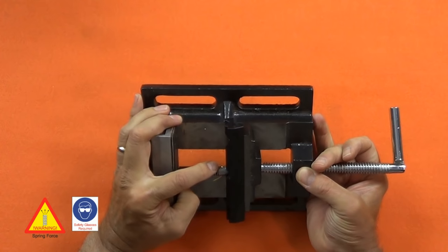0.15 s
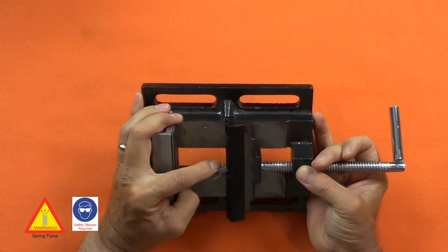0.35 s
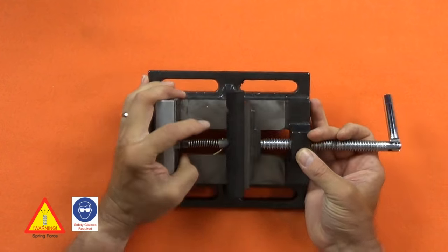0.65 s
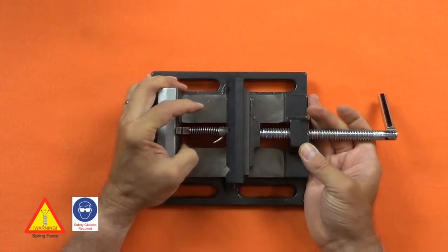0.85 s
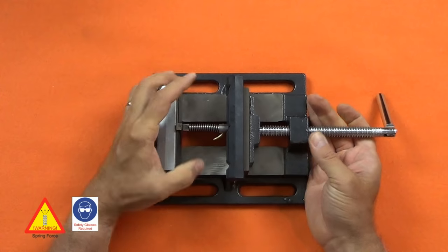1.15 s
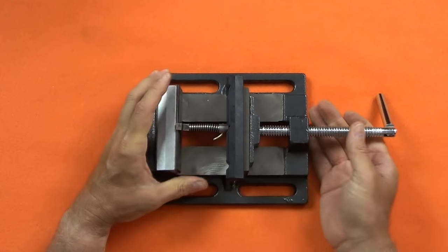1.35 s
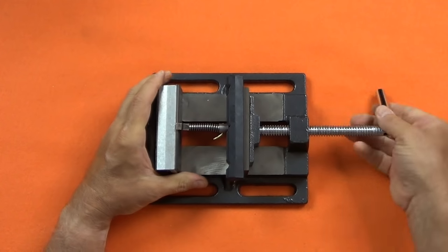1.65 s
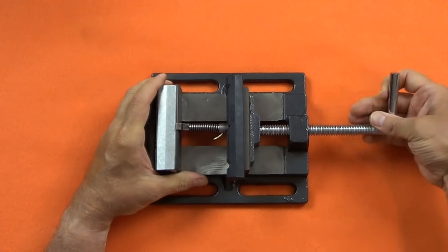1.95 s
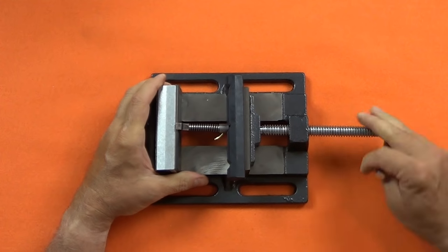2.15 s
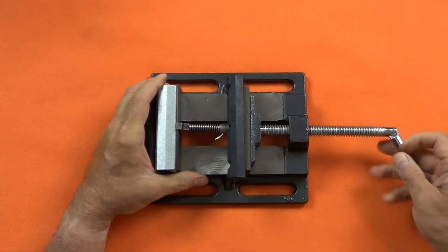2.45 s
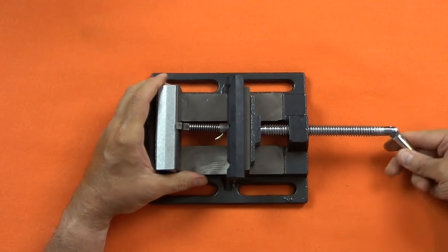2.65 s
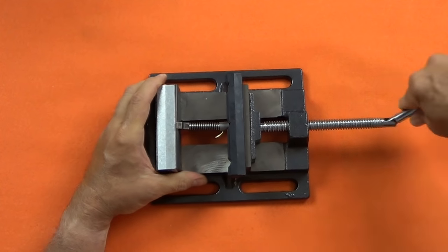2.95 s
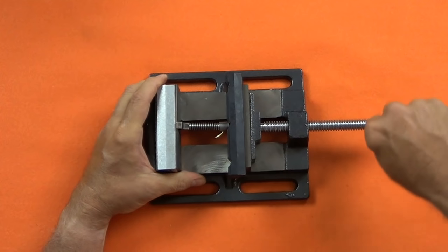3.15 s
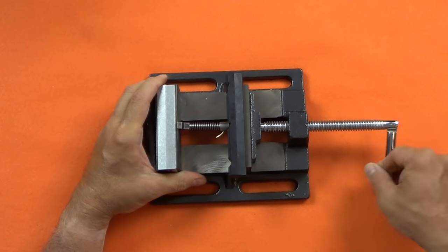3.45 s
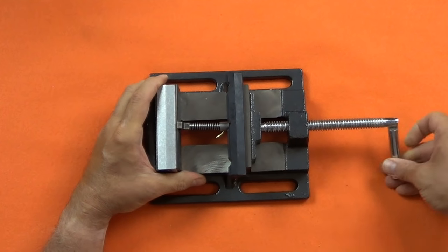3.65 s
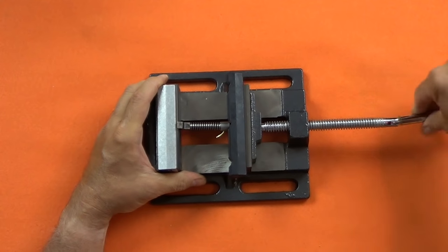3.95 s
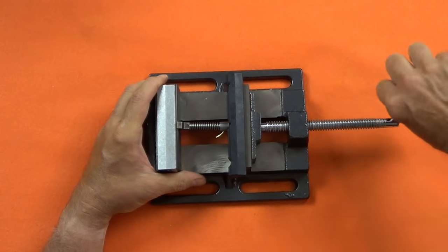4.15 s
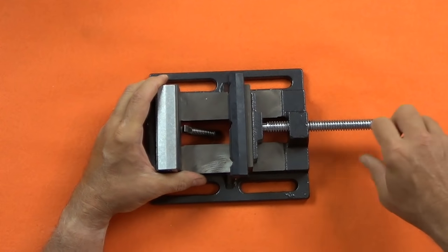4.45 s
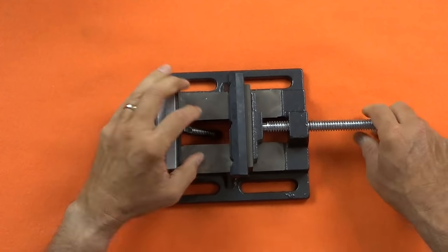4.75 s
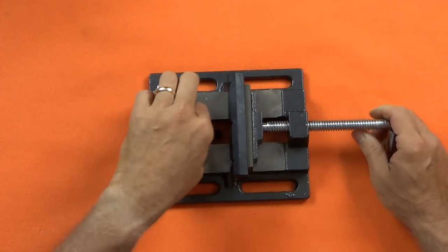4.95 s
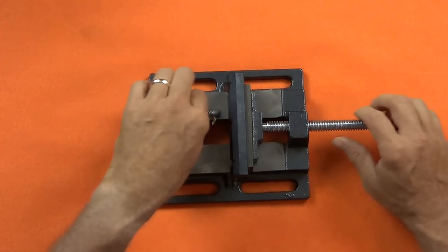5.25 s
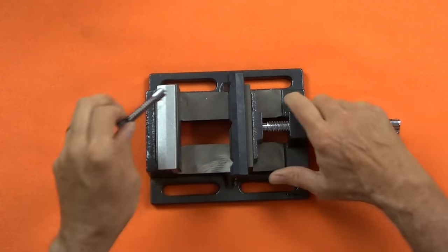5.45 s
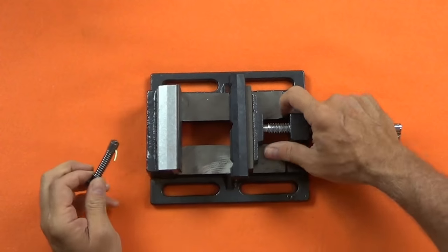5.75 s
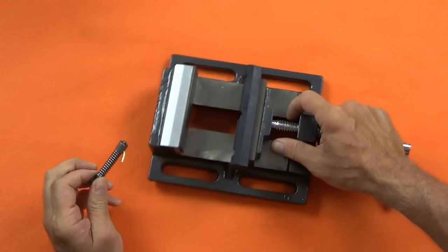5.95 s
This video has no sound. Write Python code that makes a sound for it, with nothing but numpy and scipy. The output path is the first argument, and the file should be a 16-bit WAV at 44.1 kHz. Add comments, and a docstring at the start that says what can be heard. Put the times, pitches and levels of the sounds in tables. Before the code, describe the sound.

Small iron vise handled on a cloth-covered bench: sharp clack, faint thread scraping, loose handle clicks, bright spring chatter, ringing clinks, then soft dragging.

```python
"""On a cloth-covered bench in a quiet room, a small cast-iron drill vise is handled.
Its threaded rod scrapes out and clacks home, its loose crank rattles, a freed spring drops and chatters,
the spring's steel pin clinks on the jaw, and the vise is dragged round. Impacts are noise cracks with
decaying modes, friction is random slips; room echoes answer both. Behind them lie rumble, mains hum,
and a camera's hiss and thin whine."""
import sys
import numpy as np
from scipy import signal
from scipy.fft import rfft, irfft
from scipy.io import wavfile
from scipy.ndimage import uniform_filter1d

SR = 44100
rng = np.random.default_rng(int(sys.argv[2]) if len(sys.argv) > 2 else 0)


def to_wav(sig):
    """Store sig (one row per channel, or 1-D mono) as 16-bit WAV at the path in sys.argv[1].

    Samples outside -1..1 are clipped; the rate is SR.
    """
    pcm = np.clip(np.atleast_2d(sig), -1, 1) * 32767
    pcm = np.round(pcm).astype(np.int16)
    wavfile.write(sys.argv[1], SR, pcm.T)  # frames by channels


N = 269492

# Steady background spectrum: hz, relative_density_db
FLOOR_SPECTRUM = [(20, -14), (42, -9), (55, -4), (69, 5.5), (85, 2.5), (105, -5), (175, -1.5), (260, -3.5),
                  (600, -8.5), (1500, -14.5), (3300, -15), (5000, -18.5), (10000, -18), (16000, -18.5)]
FLOOR_DB = -55  # rms
# Narrow bumps on that spectrum: centre_hz, width_hz, height_db
FLOOR_BUMPS = [(2457, 76, 11.1), (3804, 154, 8.7), (5630, 79, 2.2), (7050, 450, 2.9), (12150, 420, 3.7),
               (13100, 200, 4.2)]
# Side share of the background: hz, side_to_mid_db
FLOOR_SIDE_SHARE = [(60, -22.5), (120, -9.5), (240, -3.5), (480, 2.5), (950, 5.5), (1890, 2), (3770, -5),
                    (7520, -0.5), (15000, -37.5)]
# Mains hum and camera whine: pitch_hz, rms_db
STEADY_TONES = [(119.9, -63.5), (15735, -64.5)]

# Strokes of friction, each: start_s, attack_s, hold_s, release_s, level_db
# the hand bears on the rod and the thread scrapes harder (several strokes)
HAND_PUSHES = [(1.55, 0.095, 0.01, 0.1, -59), (1.85, 0.33, 0.03, 0.13, -58), (4.1, 0.16, 0.02, 0.1, -55.5)]
# the crank is turned
CRANKING_STROKE = (2.4, 0.3, 1.9, 0.3, -61)
# the freed spring chatters between its bounces
CHATTER_STROKE = (4.33, 0.09, 0.065, 0.05, -46.5)
# the pin slides along the jaw between its clinks
SLIDE_STROKE = (5.235, 0.035, 0.052, 0.014, -51)
# the vise slides over the cloth
DRAG_STROKE = (5.76, 0.05, 0.16, 0.16, -56)
# a stroke swells by SWELL_DB over its attack, and sinks as much over each release time
SWELL_DB = 18
# the thread's scrape peaks once a turn and eases by TURN_EASE_DB between
TURN_S, TURN_PEAK_S, TURN_EASE_DB = 0.53, 3.31, 6

# Friction spectra, each: hz, relative_density_db
THREAD_SPECTRUM = [(100, -20), (350, 2), (1400, -6), (2200, -8), (5000, -11), (8000, -12.5), (11000, -11),
                   (16000, -27)]
CHATTER_SPECTRUM = [(150, -13), (350, -9), (650, 2), (900, -1), (1300, 0), (2200, -1), (3000, -8),
                    (5000, -9), (7400, -2), (10500, -12), (13000, -24), (16000, -28)]
RASP_SPECTRUM = [(300, -16), (1300, -7), (2600, 0), (3800, 0), (5000, -7), (10000, -8), (16000, -17)]
DRAG_SPECTRUM = [(40, -10), (150, -5), (550, -6), (1500, -11), (5000, -14), (16000, -11.5)]

# Faint thread squeaks: start_s, length_s, start_hz, end_hz, rms_db
THREAD_SQUEAKS = [(2.082, 0.036, 11100, 11000, -65), (2.148, .045, 11050, 10850, -66),
                  (2.155, 0.12, 5300, 4880, -67), (4.20, 0.12, 4730, 4700, -68)]

# Steel contacts, each: start_s, strength_db, hardness_db_per_octave, casting_knock_db,
# favoured_hz (by the point of contact), ring_over_crack_db; each part then trims level and ring
# the rod clacks and ticks in its nut
ROD_CONTACTS = [(1.655, -51.5, -3, -69, 4860, -11), (1.6695, -51.5, -1, -62, 10190, -2),
                (1.6857, -31.5, 1.2, -50.5, 10570, -10), (1.6955, -48.5, -6, -56, 6480, -6),
                (2.535, -64, -3, -69, 3140, -12), (2.573, -55.5, 3, -72, 8750, -14),
                (2.667, -58, 7, -66, 12400, -15), (5.798, -47.5, 1.5, -60, 8900, -12),
                (5.8185, -47, 9, -50, 12810, -9), (5.828, -55, -4, -58, 5830, -14),
                (6.039, -57, 2, -63, 10590, -10)]
# the loose handle and the freed spring rattle on the vise
CRANK_CONTACTS = [(3.018, -59.5, -7, -68, 2160, -9), (3.27, -61.5, -2, -61, 7990, -2),
                  (3.287, -56, -1.5, -62, 7700, -10), (3.6892, -43.5, 3, -57, 11000, -8),
                  (3.6925, -37, 10, -57, 11000, -4), (3.696, -37.5, 3.5, -52, 7400, -5),
                  (3.702, -37, 3, -51.5, 11100, -5), (3.7075, -44, 0, -51, 7400, -8),
                  (3.725, -51, -3, -53, 7400, -2), (3.9485, -42.5, 1.5, -66, 7400, -6),
                  (3.951, -42.5, -1.5, -46.5, 2100, 0), (3.962, -56, -11, -46, 2020, -5),
                  (4.3085, -45.5, 2.5, -56, 7190, -2), (4.331, -52, -1, -53, 11090, 1),
                  (4.3506, -30.5, 1.5, -46, 11390, -8), (4.3555, -28.5, 1, -45, 11200, -13),
                  (4.359, -28, 5, -53, 10640, -2), (4.3665, -34.5, 3.5, -45.5, 10800, -8),
                  (4.387, -45, 0, -47, 10120, -6), (4.4062, -34.5, -5.5, -37, 9020, -9),
                  (4.424, -56, -8, -48, 2090, -6), (4.434, -50.5, -5, -46, 7430, -3),
                  (4.445, -44.5, -1.5, -44, 10640, -4), (4.4615, -38, 3, -56, 10200, -3),
                  (4.4845, -39.5, -3.5, -42, 10600, 2), (4.596, -60, -1, -62, 2100, -1),
                  (5.6, -53, -3, -62, 7840, -4), (5.655, -57, 1, -62, 10720, -2),
                  (5.677, -61.5, -4.5, -61, 2110, -3), (5.7138, -43, 0.5, -57, 11070, 0.5),
                  (5.7207, -36.5, 1.5, -57.5, 11100, -3.5), (5.758, -47.5, -1.5, -57, 6870, -4)]
# the pin clinks on the jaw
JAW_CONTACTS = [(5.2008, -41, 3.5, -69, 8510, -3), (5.245, -53, -1.5, -63, 2840, -1),
                (5.267, -47.5, -0.5, -62, 2820, 0), (5.283, -48, -1, -58, 2860, -5),
                (5.291, -58.5, -9, -65, 2280, 10), (5.304, -49.5, -2, -56.5, 5510, 3),
                (5.316, -48, -2.5, -59, 2390, 0)]
# Dull knocks of the iron frame: start_s, knock_db, clank_db, favoured_hz
FRAME_KNOCKS = [(2.773, -55, -58, 1380), (2.848, -59, -60, 1400), (3.222, -54, -72, 563),
                (3.320, -51, -72, 720), (3.501, -51, -52.5, 2050), (3.600, -47, -54, 640),
                (4.133, -47.5, -49, 2150), (4.302, -49, -65, 750), (5.786, -45, -53, 585),
                (5.879, -58, -62, 1002), (5.919, -55, -59, 570)]
# The vise rocks on the bench: start_s, level_db
BENCH_THUMPS = [(4.406, -54), (4.431, -38.5), (4.479, -48), (4.507, -52), (5.789, -49), (5.828, -57),
                (5.895, -51), (5.917, -56)]

# Modes of each part, before detuning and favouring: pitch_hz, level_db, t60_s
ROD_MODES = [(1558, -6, 0.12), (3020, -8, 0.082), (3262, -7, .06), (3970, -11, 0.089), (4683, -5, 0.065),
             (5200, -1, 0.047), (5440, -18, 0.081), (6430, -8, 0.13), (7060, -3, .09), (7321, -13, .14),
             (7860, -4, .05), (8769, -2, 0.043), (9619, -4, .04), (10100, 4, 0.039), (10632, -4, 0.054),
             (14000, -13, .08)]
CRANK_MODES = [(336.3, -11.5, 0.27), (559, -7.5, 0.056), (661, -9, 0.088), (746, -13, 0.2),
               (1399, -6.5, 0.092), (2000, -10, .08), (2064, -11.5, 0.12), (2280, -18, 0.13),
               (2915, -17.5, 0.13), (3580, -29, 0.033), (3860, -11.5, .09), (4010, -10, 0.074),
               (4686, -6, 0.054), (5500, -28, 0.12), (6900, -15, .07), (7165, 4.5, 0.041), (7270, -8, 0.14),
               (7360, 1, 0.047), (7600, -6.5, 0.066), (8400, -16, .07), (8980, -14, .05),
               (10300, -2, 0.044), (10520, 9.5, 0.02), (10810, -13, 0.042), (11350, -7, 0.044),
               (11200, 2, 0.046), (11800, -3, 0.028), (14000, -17, .08), (14860, -13, 0.059)]
JAW_MODES = [(2036, -11.5, 0.13), (2295, 0, 0.18), (2427, -7, 0.13), (2836, -0.5, 0.12), (3840, -10, 0.1),
             (4021, -8, 0.09), (4690, -12, .1), (5550, 0, 0.085), (5970, 0, .06), (6379, 0, .06),
             (7132, -4, 0.17), (7439, -9, 0.11), (7790, -7, .12), (8580, 3, 0.091), (10012, 6, .1),
             (11050, -4, .07), (14250, -13, .04), (15272, -16, .05)]
FRAME_MODES = [(341.5, -3.5, 0.28), (551, 2, .09), (638, -6.5, .1), (740, -8, 0.11), (1107, -3, 0.071),
               (1400, -7, 0.12), (2150, -13, 0.1), (2240, -15, 0.11)]
# bench top and board, whose decay is further shortened by the hands
BENCH_MODES = [(63, -1, 0.51), (85.5, -9, .15)]
BOARD_MODES = [(178, -4.5, 0.13), (198, 1.5, 0.12), (326.6, -15, 0.32)]

# Spectra of the short crack of a contact, each: hz, relative_density_db
ROD_CRACK_SPECTRUM = [(100, -30), (400, -5), (1200, -4), (1600, -3), (2100, -9.5), (3200, -1), (4100, -2),
                      (5000, -0.5), (7000, -0.5), (8600, 1), (10700, 2), (12500, -6), (16000, -10)]
STEEL_CRACK_SPECTRUM = [(100, -20), (320, -3), (600, 6), (900, -2), (1150, 6), (1700, -4), (2150, -1),
                        (2700, -7.5), (3600, -2), (5200, -4), (7400, 0.5), (9500, 1.5), (11000, 9),
                        (12500, -4.5), (16000, -2.5)]
IRON_CRACK_SPECTRUM = [(100, -17), (300, 6.5), (650, 6), (1200, -2), (2200, -12.5), (3200, -20.5),
                       (6000, -44), (12000, -49)]

# Bands of a blow (knock, clank, zing, sparkle, fizz): low_hz, high_hz
BLOW_BANDS = [(200, 1500), (1500, 6000), (6000, 9500), (9500, 12200), (12200, 16000)]
# Band balance of each part at zero hardness: clank_db, zing_db, sparkle_db, fizz_db
ROD_BALANCE = [-2, 0, -3, -13]
CRANK_BALANCE = [-3, 0.3, 0.5, -8]
JAW_BALANCE = [-0.5, 0, 0.2, -5.5]
# hardness tilts the sound about PIVOT_HZ; the band that holds the favoured pitch gains FAVOURED_BAND_DB
PIVOT_HZ, FAVOURED_BAND_DB = 7550, 4
# contact time (to 1/e) at zero hardness halves for every HALVING_DB_PER_OCTAVE of hardness
CONTACT_S, HALVING_DB_PER_OCTAVE = 0.0042, 18
FRAME_CONTACT_S = 0.0058

# Reverberation time of the room: hz, t60_s
ROOM_DECAY = [(100, 0.83), (500, 0.93), (2000, .5), (7000, .45), (11000, 0.28), (16000, 0.3)]
# Filter on the side echoes: hz, gain_db
ECHO_WIDTH = [(60, -23), (200, -10), (600, -10), (1500, -8), (2500, -13.5), (5000, -8), (8000, -11),
              (12000, -19.5), (16000, -44)]
EDGE_HZ = 15950


def amp(db):
    """Level: decibels to amplitude ratio."""
    return 10 ** (np.asarray(db) / 20)


def unit(x):
    """Normalisation: scales a signal to rms 1."""
    return x / np.sqrt(np.mean(x ** 2) + 1e-20)


def read(points, hz):
    """Logarithmic frequency: interpolates a table on a log-frequency axis."""
    f, value = np.transpose(points)
    return np.interp(np.log(hz + 1), np.log(f + 1), value)


def add(mix, s, sound):
    """Superposition: lays a sound into the mix at time s."""
    part = mix[round(s * SR):][:len(sound)]
    part += sound[:len(part)]


def colour(x, db_at):
    """Minimum phase: a causal filter of gain db_at(Hz), so that attacks stay sharp."""
    size = 2048
    log_gain = np.log(amp(db_at(abs(np.fft.fftfreq(size, 1 / SR)))) + 1e-5)
    taps = np.fft.ifft(np.exp(np.conj(signal.hilbert(log_gain)))).real
    return signal.fftconvolve(x, taps[:size // 2])[:len(x)]


def noise(db_at):
    """Spectral shaping: steady noise of rms 1 with the spectrum db_at(Hz)."""
    gain = amp(db_at(np.fft.rfftfreq(N, 1 / SR)))
    return unit(irfft(rfft(rng.standard_normal(N)) * gain, N))


def background():
    """Stationary noise and pure tones: rumble, hiss with bumps, hum and whine; returns mid and side."""
    def floor_db(hz):
        bumps = sum(db * np.exp(-((hz - f) / width) ** 2) for f, width, db in FLOOR_BUMPS)
        return read(FLOOR_SPECTRUM, hz) + bumps
    t = np.arange(N) / SR
    tones = np.zeros(N)
    for hz, db in STEADY_TONES:
        tones += amp(db) * np.sqrt(2) * np.sin(2 * np.pi * (hz * t + rng.random()))
    side_gain = amp(read(FLOOR_SIDE_SHARE, np.fft.rfftfreq(N, 1 / SR)))
    side = irfft(rfft(noise(floor_db)) * side_gain, N)
    return np.array([amp(FLOOR_DB) * noise(floor_db) + tones, amp(FLOOR_DB) * side])


def stroke(start, attack, hold, release, db):
    """Friction envelope: gain over time, linear in decibels, through attack, hold and release."""
    t = np.arange(N) / SR - start
    short_of_full = np.maximum(1 - t / max(attack, 1e-3), (t - attack - hold) / max(release, 1e-3))
    return amp(db - SWELL_DB * np.clip(short_of_full, 0, 10))


def rub(pressure, spectrum, slips_per_s, smooth):
    """Friction: tiny random slips over a smooth hiss, scaled by the pressure of the stroke."""
    slips = rng.standard_normal(N) * (rng.random(N) < slips_per_s / SR)
    grain = colour(unit(slips) + smooth * rng.standard_normal(N), lambda hz: read(spectrum, hz))
    return unit(grain) * pressure


def thread():
    """Sliding friction: the thread scrapes in its nut, swelling each turn and at each push of the hand."""
    easing = np.sin(np.pi * (np.arange(N) / SR - TURN_PEAK_S) / TURN_S) ** 2
    turns = stroke(*CRANKING_STROKE) * amp(-TURN_EASE_DB * easing)
    pressure = np.max([turns] + [stroke(*push) for push in HAND_PUSHES], axis=0)
    return rub(pressure, THREAD_SPECTRUM, slips_per_s=600, smooth=0.97)


def ring(modes, t, detune=0.):
    """Modal decay: dying sines, which grip and point of contact shift a little at each blow."""
    hz, db, t60 = np.transpose(modes)[:, :, None]
    shifted_hz = hz * (1 + detune * rng.standard_normal(hz.shape))
    phase = 2 * np.pi * (shifted_hz * t + rng.random(hz.shape))
    return (amp(db) * np.exp(-np.log(1000) * t / t60) * np.sin(phase)).sum(0)


def blow(modes, crack_spectrum, levels_db, decay, ring_db, detune, favoured_hz):
    """Impact excitation: a burst of micro-contacts cracks and pumps up the modes, balanced by band."""
    def favour(hz):
        return 8 / (1 + ((hz / favoured_hz - 1) / 0.066) ** 2)  # dB, a resonance curve
    t = np.arange(SR // 4) / SR
    attack = SR // 125  # samples
    contact = np.exp(-t / max(decay, 1e-3))
    burst = rng.standard_normal(len(t)) * contact
    crack = colour(burst, lambda hz: read(crack_spectrum, hz) + favour(hz))
    favoured_modes = [(hz, db + favour(hz) / 2, t60) for hz, db, t60 in modes]
    tone = ring(favoured_modes, t, detune) * (1 - contact ** 2)
    sound = crack / crack[:attack].std() + amp(ring_db) * tone / tone[:attack].std()
    # band levels are set from the power over the attack
    hz = np.fft.rfftfreq(attack, 1 / SR)
    power = 2 * abs(rfft(sound[:attack]) / attack) ** 2
    gains = []
    for (lo, hi), db in zip(BLOW_BANDS, levels_db):
        gain_db = db - 10 * np.log10(power[(hz >= lo) & (hz < hi)].sum())
        margin = (hi - lo) / 10
        gains += [(lo + margin, gain_db), (hi - margin, gain_db)]
    return colour(sound, lambda hz: read(gains, hz))


def steel(hits, modes, crack_spectrum, balance_db, level_db, ringing_db, detune):
    """Contact stiffness: the harder a steel contact, the brighter and shorter its crack."""
    out = np.zeros(N)
    lo, hi = np.transpose(BLOW_BANDS[1:])
    octaves = np.log2(np.sqrt(lo * hi) / PIVOT_HZ)
    for s, strength_db, hardness, knock_db, favoured_hz, ring_db in hits:
        favoured_band = (lo <= favoured_hz) & (favoured_hz < hi)
        tilt_db = hardness * octaves
        click_db = strength_db + np.array(balance_db) + tilt_db + FAVOURED_BAND_DB * favoured_band
        decay = CONTACT_S / 2 ** (hardness / HALVING_DB_PER_OCTAVE)
        click = blow(modes, crack_spectrum, [knock_db, *click_db], decay,
                     ring_db + ringing_db, detune, favoured_hz)
        add(out, s, click)
    return amp(level_db) * out


def rod():
    """Impact: the threaded rod clacks and ticks in its nut, exciting the rod's modes."""
    return steel(ROD_CONTACTS, ROD_MODES, ROD_CRACK_SPECTRUM, ROD_BALANCE,
                 level_db=-1, ringing_db=-4.5, detune=.001)


def squeaks(waver=0.013, flutter_db=5):
    """Stick-slip in the dry thread: short, fuzzy, broken tones that sag in pitch."""
    out = np.zeros(N)
    for s, length, start_hz, end_hz, db in THREAD_SQUEAKS:
        n = int(length * SR)
        wander = unit(uniform_filter1d(rng.standard_normal(n), size=60))
        hz = np.linspace(start_hz, end_hz, n) * (1 + waver * wander)
        grip = amp(flutter_db * unit(uniform_filter1d(rng.standard_normal(n), size=300)))
        tone = grip * np.sin(2 * np.pi * np.cumsum(hz) / SR) * signal.windows.tukey(n, .6)
        add(out, s, amp(db) * unit(tone))
    return out


def frame():
    """Damped impact: the hand-damped casting knocks as the crank pushes it about."""
    out = np.zeros(N)
    for s, *levels_db, favoured_hz in FRAME_KNOCKS:
        knock = blow(FRAME_MODES, IRON_CRACK_SPECTRUM, levels_db, FRAME_CONTACT_S,
                     ring_db=-5, detune=.012, favoured_hz=favoured_hz)
        add(out, s, knock)
    return out


def crank():
    """Repeated impact: the loose handle and the freed spring rattle on the vise."""
    return steel(CRANK_CONTACTS, CRANK_MODES, STEEL_CRACK_SPECTRUM, CRANK_BALANCE,
                 level_db=-.5, ringing_db=0.5, detune=.003)


def chatter():
    """Intermittent contact: sparse random slips of the freed spring between its bounces."""
    return rub(stroke(*CHATTER_STROKE), CHATTER_SPECTRUM, slips_per_s=350, smooth=0.24)


def bench(rise=0.0036, board_db=-1, damping_s=0.09, detune=0.05):
    """Damped modes: low thumps of the bench, softened by the cloth and damped by the hands' weight."""
    out, t = np.zeros(N), np.arange(SR // 3) / SR
    shape = (1 - np.exp(-t / rise)) * np.exp(-t / damping_s)
    for s, db in BENCH_THUMPS:
        modes = ring(BENCH_MODES, t, detune) + amp(board_db) * ring(BOARD_MODES, t, detune)
        add(out, s, amp(db) * modes * shape)
    return out


def jaw():
    """Impact: the steel pin clinks against the jaw, exciting the jaw's modes."""
    return steel(JAW_CONTACTS, JAW_MODES, STEEL_CRACK_SPECTRUM, JAW_BALANCE,
                 level_db=-1.0, ringing_db=-0.5, detune=0.0012)


def scrape(pressure, modes, slips_per_s, detune=.001):
    """Sustained excitation: tiny steel slips keep a part's modes ringing while the contact lasts."""
    slips = np.sign(rng.standard_normal(N)) * (rng.random(N) < slips_per_s / SR)
    response = ring(modes, np.arange(SR // 3) / SR, detune)
    return signal.fftconvolve(unit(slips) * pressure, response / np.linalg.norm(response))[:N]


def slide(rasp_db=1):
    """Friction-driven resonance: the pin slides along the jaw, ringing its modes under a rasp."""
    pressure = stroke(*SLIDE_STROKE)
    rasp = rub(pressure, RASP_SPECTRUM, slips_per_s=900, smooth=0.4)
    return scrape(pressure, JAW_MODES, slips_per_s=1000) + amp(rasp_db) * rasp


def drag():
    """Sliding friction: the vise is dragged over the cloth."""
    return rub(stroke(*DRAG_STROKE), DRAG_SPECTRUM, slips_per_s=300, smooth=.6)


def echoes(t60_at, delay):
    """Reverberation: scattered reflections of energy 1, each band dying at its own speed."""
    n = SR * 2 // 3
    taps = rng.standard_normal(n) * (rng.random(n) < 1 / 8)
    hz, t, z = signal.stft(taps, SR, nperseg=128)
    decay = np.exp(-np.log(1000) * t / t60_at(hz)[:, None])
    tail = signal.istft(z * decay, SR, nperseg=128)[1]
    return np.r_[np.zeros(int(delay * SR)), tail / np.linalg.norm(tail)]


def room(x, near_db=-12, near_t60=0.063, far_db=-14, side_near_db=-2, side_near_t60=.04, side_far_db=-11):
    """Early and late reflection: bench and walls answer each sound; returns mid and side."""
    def answer(t60_at, delay):
        return signal.fftconvolve(x, echoes(t60_at, delay))[:N]

    def walls(hz):
        return read(ROOM_DECAY, hz)
    near = answer(lambda hz: np.full_like(hz, near_t60), .006)
    mid = x + amp(near_db) * near + amp(far_db) * answer(walls, .012)
    side_near = answer(lambda hz: np.full_like(hz, side_near_t60), 0)
    side = amp(side_near_db) * side_near + amp(side_far_db) * answer(walls, .008)
    return np.array([mid, colour(side, lambda hz: read(ECHO_WIDTH, hz))])


def scene(balance_db=0.1):
    """Superposition and level panning: all sources in the room, the vise just right of centre."""
    air_mid, air_side = background()
    vise = thread() + rod() + squeaks() + frame() + crank()
    vise += chatter() + bench() + jaw() + slide() + drag()
    mid, side = room(vise)
    left = (mid + side) * amp(-balance_db) + air_mid + air_side
    right = (mid - side) * amp(balance_db) + air_mid - air_side
    return np.array([left, right])


def record(dry):
    """Band limiting: a steep linear-phase low-pass at EDGE_HZ."""
    lowpass = signal.firwin(1023, EDGE_HZ, window=("kaiser", 8), fs=SR)
    return signal.oaconvolve(dry, lowpass[None], "same")


dry = scene()
out = record(dry)
to_wav(out)
```